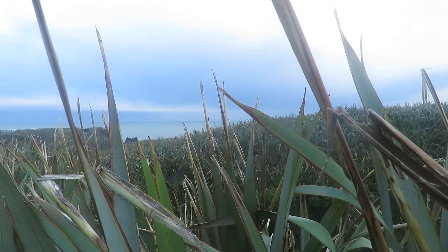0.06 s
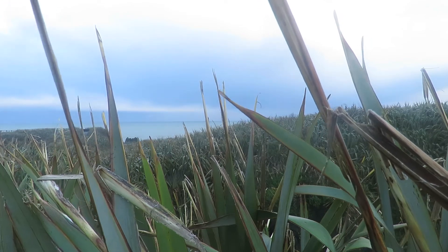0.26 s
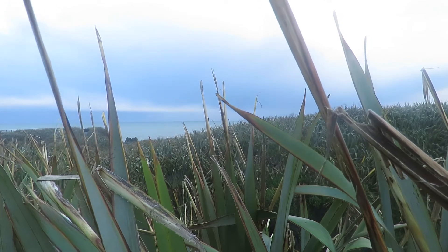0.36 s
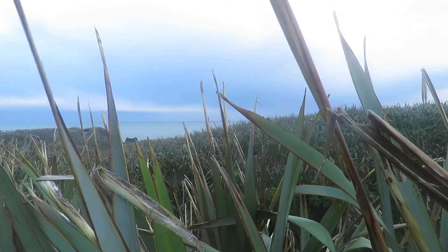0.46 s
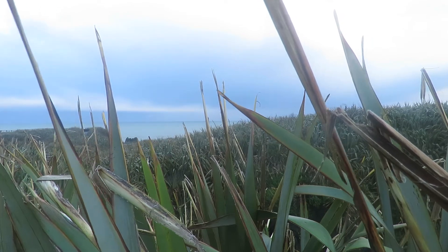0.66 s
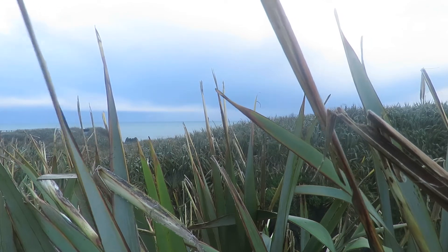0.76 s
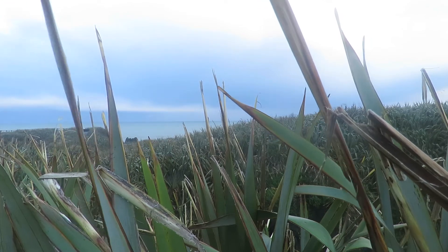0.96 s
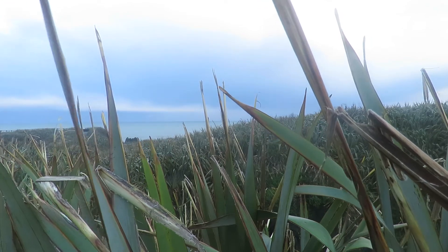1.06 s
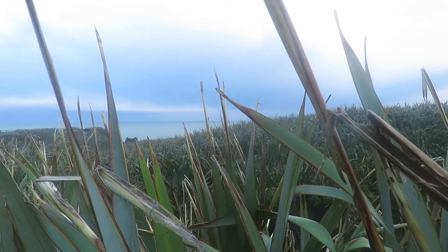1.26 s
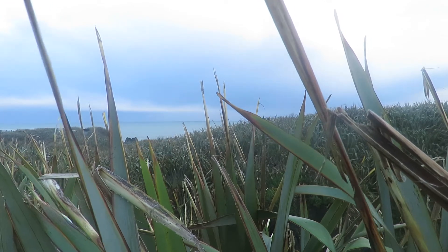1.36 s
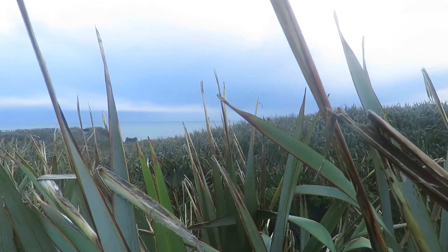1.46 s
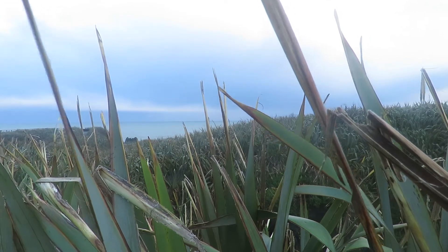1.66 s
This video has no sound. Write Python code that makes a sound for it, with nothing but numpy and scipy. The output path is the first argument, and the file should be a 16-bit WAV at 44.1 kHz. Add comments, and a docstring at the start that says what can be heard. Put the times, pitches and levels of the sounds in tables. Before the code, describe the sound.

A roar of wind swells and dies away on an overgrown coastal slope. Soft puffs and thumps buffet the microphone before and after the gust, which crests with a hollow rumble and a faint hiss of leaves.

```python
"""A roar of wind swells and dies away on an overgrown coastal slope.
Over a low rumble, eddies buffet the two microphone ports with short puffs and thumps. A broad rush builds
from straight ahead and crests with a wide hiss of leaves; a faint hum and the peak of the deep, hollow
rumble follow just behind. The roar deepens and fades, and the puffs and thumps return.
A limiter holds the highest peaks."""
import sys
import numpy as np
from scipy import signal
from scipy.fft import rfft, irfft, next_fast_len
from scipy.io import wavfile
from scipy.ndimage import uniform_filter1d, minimum_filter1d, map_coordinates

SR = 44100
rng = np.random.default_rng(int(sys.argv[2]) if len(sys.argv) > 2 else 0)


def log_audio(samples):
    """Write samples as a 16-bit WAV file to the path given in sys.argv[1]."""
    # one column per channel
    frames = np.atleast_2d(samples).T
    # limit to full scale, then quantise
    limited = np.clip(frames, -1, 1)
    pcm = np.round(limited * 32767).astype(np.int16)
    wavfile.write(sys.argv[1], SR, pcm)


N = 74970
TIME = np.arange(N) / SR

# The swell and fall of the rush. Each row: time in seconds, level in dB.
RUSH_SWELL = [(0, -37.5), (.18, -35.5), (.3, -31.5), (.45, -27.5), (.6, -23.5), (.74, -22), (.86, -22.5),
              (.99, -24), (1.12, -27.5), (1.3, -33), (1.5, -40), (1.7, -40)]


def amp(db):
    """Decibels to gain."""
    return 10 ** (np.asarray(db) / 20)


def unit(x):
    """Scale to rms 1."""
    return x / np.sqrt(np.mean(x ** 2) + 1e-20)


def along(points, hz):
    """Read (Hz, value) points on a log frequency axis."""
    freqs, values = np.transpose(points)
    return np.interp(np.log(hz + 1), np.log(freqs + 1), values)


def fader(points):
    """Draw a level curve through (seconds, dB) points."""
    return np.interp(TIME, *np.transpose(points))


def lull_db():
    """The rush against its crest in dB: zero there, negative elsewhere."""
    db = fader(RUSH_SWELL)
    return db - db.max()


def wobble(rate):
    """A smooth random curve, rate knots a second."""
    return map_coordinates(rng.standard_normal(256), [TIME * rate], mode="wrap")


def resonance(hz, centre, width):
    """A resonant peak: gain 1 at the centre, width Hz across at half gain."""
    return 1 / (1 + (2 * (hz - centre) / width) ** 2)


def filtered(x, response):
    """Equalise x with a gain given as a function of Hz."""
    size = next_fast_len(N + SR // 2)
    return irfft(rfft(x, size) * response(np.fft.rfftfreq(size, 1 / SR)), size)[..., :N]


def turbulence(colour, width_db, patchy_db):
    """Stereo air noise of rms 1, mottled in time and frequency; width is side over mid."""
    spectra = signal.stft(rng.standard_normal((2, N)), nperseg=512)[2]
    patches = uniform_filter1d(rng.standard_normal(spectra.shape[1:]), size=5, axis=0)
    patches = unit(uniform_filter1d(patches, size=12, axis=1))
    mid, side = signal.istft(spectra * amp(patchy_db * patches), nperseg=512)[1][:, :N]
    mid = filtered(mid, colour)
    side = filtered(side, lambda hz: colour(hz) * amp(width_db(hz)))
    return unit(np.array([mid + side, mid - side]))


def steadied(x, span_s):
    """Ride out the slow chance swells of a noise, leaving rms 1."""
    power = uniform_filter1d(np.mean(x ** 2, axis=0), size=int(span_s * SR))
    return unit(x / np.sqrt(np.abs(power) + 1e-9))


def rumble():
    """The low body of the roar: it rings hollow as the wind peaks and deepens after the crest."""
    # The rumble's tone. Each row: frequency in Hz, relative level in dB.
    tone = [(12, -46), (24, -27.5), (42, -13.5), (64, 3), (90, -2), (140, -1.5), (200, -2), (240, -9.5),
            (320, -14.5), (500, -44.5), (1200, -61), (4000, -110)]
    # Hollow resonances. Each row: centre in Hz, width in Hz, relative level in dB.
    hollows = [(69.4, 6.8, -.5), (112.5, 11, 2.5), (165, 11, 2.5), (198.3, 22.6, 3.5)]
    # The swell, ahead of the deepening. Each row: time in seconds, level in dB.
    swell = [(0, -32.5), (.19, -32.5), (.26, -21), (.31, -24), (.35, -26.5), (.46, -18), (.57, -18.5),
             (.63, -15), (.72, -14), (.82, -16), (.88, -14.5), (.97, -14), (1.06, -19), (1.2, -21),
             (1.28, -26.5), (1.45, -32), (1.7, -38.5)]
    width_db, deep_hz = -37.5, 95
    deepening_s, deepening_db_per_s = (.76, .96), 18
    ring = lambda hz: sum(amp(db) * resonance(hz, centre, width) for centre, width, db in hollows)
    broad = turbulence(lambda hz: amp(along(tone, hz)), lambda hz: width_db, patchy_db=-0.35)
    hollow = turbulence(ring, lambda hz: width_db, patchy_db=-0.5)
    body = steadied(broad + hollow * amp(-3.5 + .35 * lull_db()), span_s=.07)
    deep = filtered(body, lambda hz: 1 / (1 + (hz / deep_hz) ** 8))
    # The bottom end ramps from a slight cut to a slight boost.
    deep_db = deepening_db_per_s * (np.clip(TIME, *deepening_s) - np.mean(deepening_s))
    return (body - deep + deep * amp(deep_db)) * amp(fader(swell) + 0.26 * wobble(rate=16.26))


def rush():
    """The broad roar: the gust's front fills out the mids; narrow at the crest, wider in the lulls."""
    # The rush's tone. Each row: frequency in Hz, relative level in dB.
    tone = [(120, -4.5), (300, -2), (500, 0.37), (780, -1.5), (1000, -6.5), (1230, -5.5), (1400, -10),
            (1950, -12), (2500, -19.5), (3300, -24.5), (5000, -38), (8000, -49), (14000, -72.5)]
    # Stereo width at the crest. Each row: frequency in Hz, side over mid in dB.
    width = [(300, -21.5), (650, -25), (1100, -18.5), (2000, -16), (4000, -12.5)]
    front_s, front_half_s, front_db = 0.51, 0.27, 2
    widening = 0.38  # dB of width per dB that the rush drops
    noise = turbulence(lambda hz: amp(along(tone, hz)), lambda hz: along(width, hz), patchy_db=0.8)
    midrange = filtered(noise, lambda hz: resonance(hz, centre=850, width=1100))
    front = np.exp(-((TIME - front_s) / front_half_s) ** 2)
    noise = noise + midrange * (amp(front_db * front) - 1)
    mono = noise.mean(axis=0)
    spread = mono + (noise - mono) * amp(-widening * lull_db())
    return spread * amp(fader(RUSH_SWELL) + 0.44 * wobble(rate=11))


def puffs():
    """Eddies hit the microphone: bell-shaped bursts of low noise, unrelated from port to port."""
    # The bursts. Each row: centre in seconds, half length in seconds, level in dB.
    bursts = [(0.062, .014, -37.5), (0.139, 0.021, -29.5), (0.222, 0.023, -31.5), (0.276, 0.013, -22.5),
              (.32, 0.044, -28), (.448, 0.02, -29), (1.08, 0.032, -28), (1.149, 0.018, -21.5),
              (1.242, 0.034, -36), (1.336, 0.047, -30.5), (1.38, 0.041, -25.5), (1.485, 0.017, -35),
              (1.554, 0.013, -25), (1.625, 0.066, -30)]
    # Their dull tone. Each row: frequency in Hz, relative level in dB.
    tone = [(20, -43), (45, -22), (70, -4), (120, 2), (200, -1), (300, -14.5), (500, -25), (1200, -57.5),
            (4000, -100)]
    envelope = sum(amp(db) * np.exp(-((TIME - at) / half) ** 2) for at, half, db in bursts)
    return envelope * turbulence(lambda hz: amp(along(tone, hz)), lambda hz: 0, patchy_db=2.5)


def thumps():
    """Eddies meet both ports head-on: a swing or two of pressure each."""
    # The hits. Each row: centre in seconds, pitch in Hz, envelope peak in dB.
    hits = [(0.311, 110, -17), (0.396, 131, -14.5), (.453, 150, -13), (1.09, 95, -10), (1.35, 85, -20)]
    half_length_cycles = .8
    pressure = np.zeros(N)
    for at, hz, db in hits:
        cycles = (TIME - at) * hz
        envelope = amp(db) * np.exp(-(cycles / half_length_cycles) ** 2)
        pressure += envelope * np.cos(2 * np.pi * cycles + rng.uniform(0, 2 * np.pi))
    return pressure


def leaves():
    """Foliage flares with the gust in a faint, wide hiss and rustles unevenly."""
    # The bright tone of the leaves. Each row: frequency in Hz, relative level in dB.
    tone = [(800, -8.5), (2500, 0), (4500, 0.5), (6500, -5), (9000, -8), (11500, -8), (13000, -15),
            (14500, -33)]
    # Their swell. Each row: time in seconds, level in dB.
    swell = [(0, -65.5), (.2, -65.5), (.45, -59), (.6, -54.5), (.72, -54.5), (.9, -54), (1.1, -58.5),
             (1.3, -62.5), (1.5, -66), (1.7, -63.5)]
    hiss = turbulence(lambda hz: amp(along(tone, hz)), lambda hz: 0.5, patchy_db=1.2)
    return hiss * amp(fader(swell) + 0.1 * wobble(rate=25))


def hum():
    """A wavering low hum blooms just behind the crest and reaches the two ports slightly apart."""
    pitch_hz, waver_hz, port_lag_rad = 275, 4, 0.31
    crest_db, delay_s, growth = -27.5, .09, 1.8  # growth in dB per dB of rush
    phase = 2 * np.pi * np.cumsum(pitch_hz + waver_hz * wobble(rate=22)) / SR
    tone = unit(np.sin(phase + port_lag_rad * np.array([[.5], [-.5]])))
    drive_db = np.interp(TIME - delay_s, TIME, lull_db())
    flutter_db = 2.0 * wobble(rate=18)
    return tone * amp(crest_db + growth * drive_db + flutter_db)


def scene():
    """The swelling roar with its hum and leaves, and the buffeting on the microphone."""
    return rush() + rumble() + hum() + leaves() + puffs() + thumps()


def record(dry):
    """A look-ahead limiter holds the peaks, then a brick-wall filter cuts the very top."""
    ceiling, window_samples, top_hz = .6, 600, 14500
    needed = np.minimum(1, ceiling / (np.abs(dry).max(axis=0) + 1e-9))
    held = minimum_filter1d(needed, size=window_samples)
    gain = uniform_filter1d(held, size=window_samples)
    return filtered(dry * gain, lambda hz: hz < top_hz)


dry = scene()
out = record(dry)
log_audio(out)
```